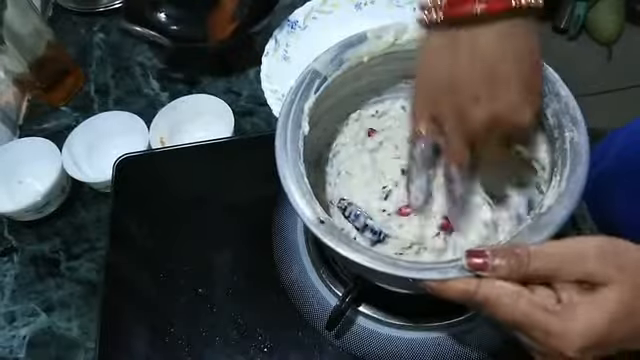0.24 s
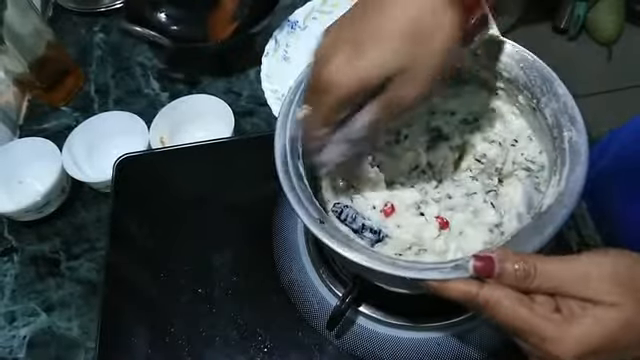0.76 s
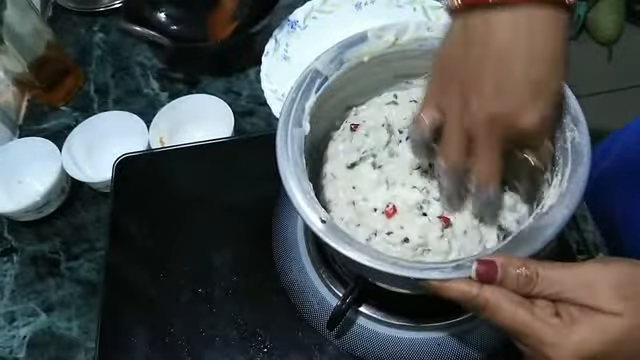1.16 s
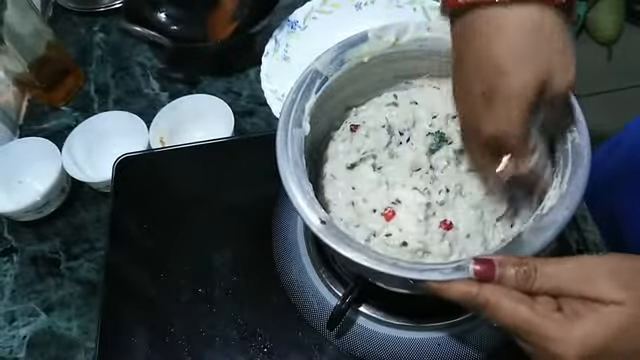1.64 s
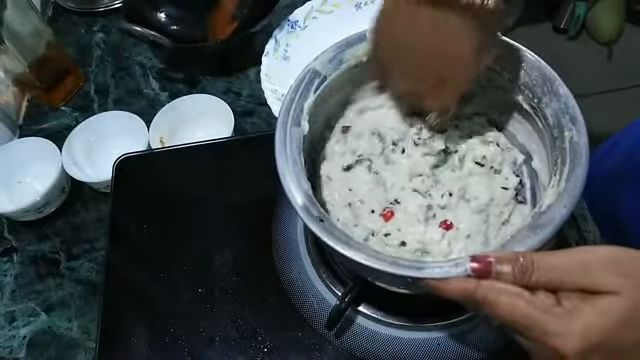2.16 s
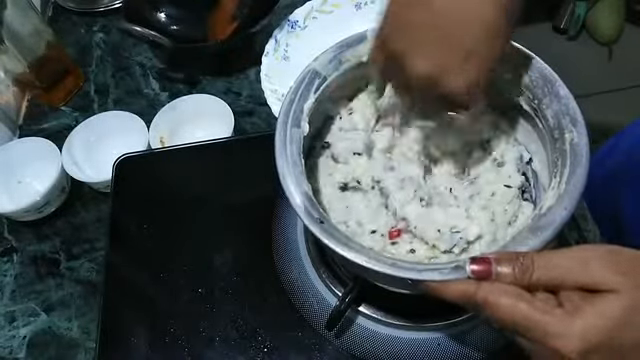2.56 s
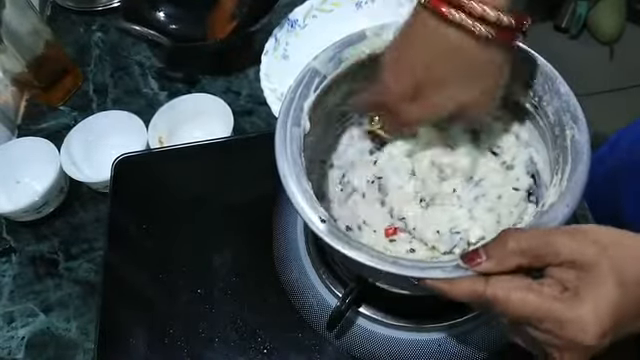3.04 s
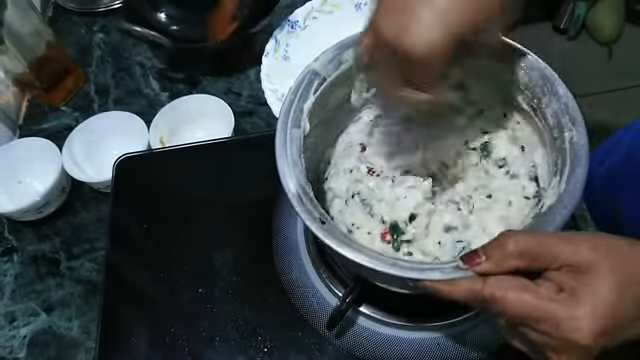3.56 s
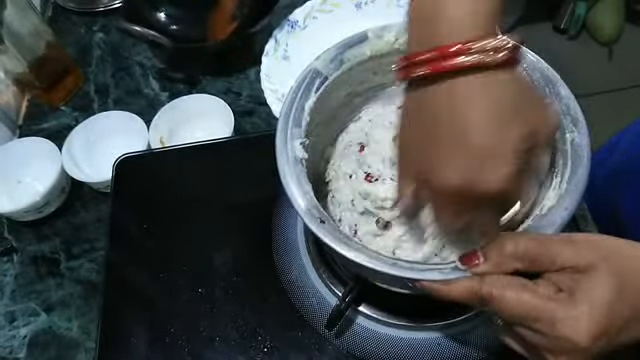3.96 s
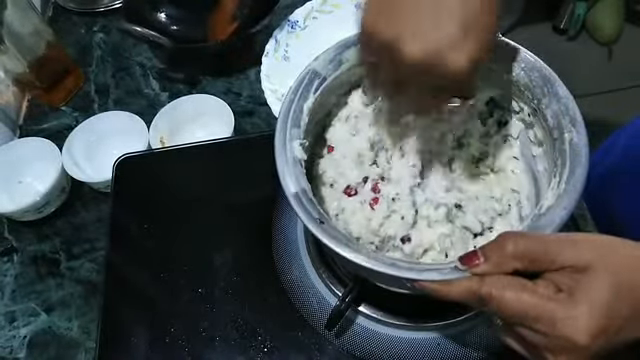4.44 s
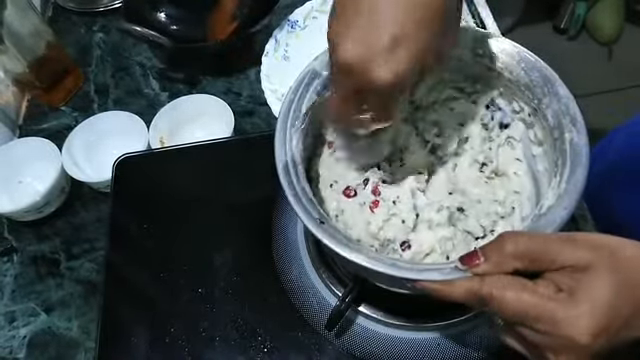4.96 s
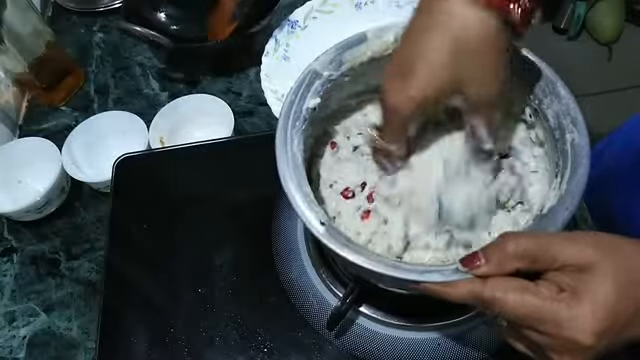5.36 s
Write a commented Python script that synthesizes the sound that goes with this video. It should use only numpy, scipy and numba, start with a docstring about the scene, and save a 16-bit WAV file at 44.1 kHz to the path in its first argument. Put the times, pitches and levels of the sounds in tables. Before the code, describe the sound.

In a small kitchen, close to the microphone, fingers work through wet rice paste with irregular squishes and fine, moist crackles. A sharp clack from the steel bowl comes first, then dull knocks, a hissy squirt and one tiny wet squeak. More squelching, light clicks and knocks follow as the bowl rocks on its stand, easing off and then picking up once more. A low hum runs underneath.

```python
"""Kneading wet rice in a steel bowl.

A hand works the paste on a stove top, an arm's length away in a small tiled kitchen. The bowl knocks
on its stand and rings, damped by the paste. Dragging fingers burst air pockets and squeeze out jets of
air and whey; paste smacks as it leaves the skin. Thin tones, one squeak, a low wavering hum."""
import sys
import numpy as np
from scipy import signal
from scipy.fft import rfft, irfft
from scipy.io import wavfile
from scipy.ndimage import uniform_filter1d
from numba import njit

SR = 44100
rng = np.random.default_rng(int(sys.argv[2]) if len(sys.argv) > 2 else 0)


def digitize_waveform(pressure):
    """Quantize a signal to 16-bit integers and store it at the path in sys.argv[1].

    Rows of a 2-D input are taken as channels; values are limited to [-1, 1].
    """
    field = np.atleast_2d(pressure).T
    bounded = np.clip(field, -1, 1)
    quanta = np.round(bounded * 32767).astype(np.int16)
    wavfile.write(sys.argv[1], SR, quanta)


N = 247401

# hum contour: time_s, level_db
HUM_CONTOUR = [(0.0, -41), (0.11, -48), (0.23, -43), (0.6, -46.5), (1.09, -45), (1.31, -55), (1.64, -45),
               (1.75, -53), (2.08, -47.5), (2.28, -46.5), (2.48, -54), (2.75, -52), (2.98, -44),
               (3.45, -50.5), (4.06, -47.5), (4.48, -51.5), (5.28, -48), (5.61, -52)]
# kitchen resonances in the hum: centre_hz, width_hz, relative_db
HUM_RESONANCES = [(80, 27, -20.5), (113, 8.1, -5.5), (148.5, 19.3, 2), (283.9, 19, -4), (334.1, 12, -13.5),
                  (536.4, 17, -11.5), (602.7, 30, -15.5), (717, 26, -19.5), (820, 110, -29.5)]
# side-channel spectrum of the hum: freq_hz, gain_db
HUM_SIDE_SPECTRUM = [(40, -13), (100, -13), (280, -16), (500, -12.5), (900, -12.5)]
# broad rumble spectrum: freq_hz, relative_db
RUMBLE_SPECTRUM = [(20, -16), (45, -3), (70, 14), (200, 7), (400, 3), (850, -39), (1000, -76.5)]
# thin whistles: centre_hz, width_hz, level_db
WHISTLE_BANDS = [(4060, 45, -89), (5700, 60, -91.5), (6370, 36, -85.5), (8350, 46, -97)]
# hiss spectrum: freq_hz, density_db_per_hz
HISS_SPECTRUM = [(900, -134), (2000, -132), (6000, -132), (12000, -129), (16000, -139)]
# kitchen reverberation: centre_hz, t60_s, level_db, stereo_correlation
REVERB_BANDS = [(118, 0.029, -8, 1), (216.7, 0.26, -4, 1), (472, 0.27, -4.5, 0.85), (1156, 0.21, -5.5, 0),
                (1916, 0.21, -1, 0.21), (4180, 0.21, -1.5, .05), (8900, 0.28, -4, .05),
                (13100, 0.12, -5, .05)]
# thin tones and 4 kHz whistle swells: start_s, level_db, pitch_hz, decay_ms
THIN_TONE_EVENTS = [(1.11, -59, 4560, 65), (0.925, -60, 2900, 27), (2.44, -74, 3960, 44),
                    (2.472, -43, 6120, 2.9), (2.472, -49, 6700, 3.5), (4.655, -74, 4060, 75),
                    (5.076, -52, 6100, 4)]
# wet squeak: start_s, level_db, pitch_hz, decay_ms
SQUEAK_EVENTS = [(1.596, -44, 6140, 15)]
# pitched pops and bowl clacks: start_s, level_db, pitch_hz, decay_ms
POP_CLACK_EVENTS = [(0.074, -41, 1490, 3.7), (0.16, -21, 808, 2.4), (0.161, -18, 1890, 2.2),
                    (0.49, -63, 1410, 12), (0.685, -60, 1320, 25), (0.793, -36.5, 3300, 3.3),
                    (4.107, -36, 2670, 3.4), (0.115, -59, 1420, 25), (0.305, -33, 1690, 3),
                    (2.039, -47, 4850, 3), (3.438, -38, 1460, 4.1), (3.445, -75, 880, 6),
                    (1.834, -30, 2020, 6), (0.69, -56.5, 2260, 11), (0.692, -60.5, 3320, 5.9),
                    (1.612, -54.5, 4400, 5.4), (2.255, -55.5, 1000, 23), (2.298, -44, 1330, 4.3),
                    (2.3, -47.5, 2650, 6.1), (2.764, -43, 4580, 6), (2.872, -47.5, 1205, 9.8),
                    (2.912, -47, 1287, 16), (2.945, -50, 1454, 15), (2.955, -41, 4140, 3),
                    (3.0, -48, 1486, 12), (3.035, -52, 2500, 12), (3.059, -46.5, 4930, 3.3),
                    (3.073, -61, 1240, 6), (3.149, -29.5, 1184, 5.9), (3.56, -72, 2140, 36),
                    (3.59, -65, 3370, 13), (3.679, -43, 2860, 4.2), (3.682, -47.5, 2166, 8.4),
                    (3.688, -50, 4200, 9), (3.693, -49, 2790, 5), (3.734, -43, 2070, 4.5),
                    (3.77, -50, 1350, 6.9), (3.79, -54, 1360, 13), (3.838, -52, 2200, 9),
                    (3.844, -45, 1206, 6.8), (3.882, -55, 1520, 3.7), (3.903, -46, 1530, 6.4),
                    (3.92, -57, 2770, 9), (3.926, -62, 4600, 5.5), (3.944, -60, 2850, 6),
                    (4.106, -37, 1767, 9.8), (4.124, -38.5, 895, 8.6), (4.667, -54.5, 1770, 5.7),
                    (4.668, -60, 2900, 8.1), (4.686, -78, 1256, 15), (4.762, -43, 2380, 2.8),
                    (4.852, -71, 3370, 8.5), (4.862, -64.5, 2740, 14), (4.865, -66.5, 1204, 37),
                    (4.953, -58.5, 1730, 11), (4.956, -65, 2670, 5), (4.975, -66, 2140, 16),
                    (5.192, -38, 872, 8.7), (5.221, -50.5, 5540, 5), (5.227, -45.5, 3320, 7.1)]
# jets between the fingers: start_s, level_db, centre_hz, decay_ms
SQUIRT_EVENTS = [(0.987, -35, 8300, 23), (1.526, -23.5, 6700, 3.4), (1.578, -23, 4700, 13.2),
                 (1.592, -27.5, 2000, 13.2), (2.035, -50.5, 6450, 71), (2.727, -40, 8800, 27),
                 (2.773, -34, 4900, 18.6), (2.775, -52, 1070, 360), (2.909, -31.5, 6960, 17),
                 (3.677, -39.5, 5800, 36), (4.308, -30.5, 8900, 10.2), (5.14, -51, 6900, 14),
                 (5.208, -35, 5300, 10.6)]
# paste leaving skin: start_s, direct_db, centre_hz, walls_db, body_re_tick_db
SMACK_EVENTS = [(0.126, -58, 4730, -71, -15), (0.256, -59, 9500, -76, -20), (0.308, -54, 8950, -60, 4),
                (0.3307, -59, 8540, -71, -16), (0.451, -64, 10600, -75, -13),
                (0.4583, -54.5, 4030, -61, -23), (0.5562, -66, 6430, -66.5, -41),
                (0.913, -49, 4900, -44, -3), (1.275, -59, 9900, -65, -0.5), (1.372, -72.5, 4750, -82, 6.5),
                (1.636, -53.5, 6600, -71, 4.5), (1.7032, -46.5, 9300, -62, -3.5),
                (2.0376, -62, 4940, -53.5, -13), (2.039, -54.5, 10900, -54, -18),
                (2.07, -54, 9600, -60, -26), (2.142, -62, 10100, -66, -13), (2.37, -74, 12400, -73, -7),
                (2.4753, -66, 6430, -68, -3), (2.6597, -65.5, 12750, -65.5, -13.5),
                (2.69, -70, 6300, -69.5, -9.5), (2.7657, -51.5, 4570, -59, -22.5),
                (2.7735, -71, 4120, -54.5, -24), (3.0588, -61, 6500, -72, -17),
                (3.2065, -76, 4170, -64, -15), (3.266, -64.5, 13200, -82, -3),
                (3.3189, -52, 10700, -63, -11.5), (3.3335, -57, 10700, -62.5, -29),
                (3.367, -69, 10700, -64.5, -16), (3.4872, -60.5, 10700, -68, -4),
                (3.898, -61, 4870, -58.5, 4), (4.045, -72, 5500, -72, -2), (4.159, -67, 6950, -74, -20),
                (4.298, -54, 6500, -61, -0.5), (4.4506, -55.5, 11460, -62.5, -9.5),
                (4.7597, -62, 8300, -59.5, -23.5), (5.001, -74, 11100, -67.5, -12),
                (5.0642, -66, 7050, -53, -8), (5.0767, -53.5, 5930, -61, -28),
                (5.141, -73, 6550, -51.5, -2), (5.3597, -66, 12700, -65, -14),
                (5.3947, -57, 12900, -61, -10), (5.414, -58.5, 9800, -59.5, -21)]
# finger strokes: full_pressure_s, hold_s, squelch_db, sizzle_db, bubble_hz
FINGER_STROKES = [(0.0, 0.0051, -50, -44, 1211), (0.138, 0.051, -46.5, -42.5, 1717),
                  (0.255, 0.13, -51, -61.5, 1372), (0.412, 0.1, -74, -69, 1238),
                  (0.554, 0.049, -81.5, -84.5, 1394), (0.67, 0.46, -73, -79, 1430),
                  (1.006, 0.049, -58, -54, 1685), (1.13, 0.09, -55.5, -60, 1623),
                  (1.369, 0.03, -87, -69.5, 1723), (1.602, 0.035, -57.5, -44.5, 1100),
                  (1.732, 0.029, -69.5, -66, 1256), (1.863, 0.044, -58.5, -70, 1810),
                  (2.078, 0.013, -56, -53.5, 1050), (2.163, 0.013, -61, -71, 1300),
                  (2.305, 0.025, -58, -82, 1000), (2.444, .02, -82, -74.5, 1076),
                  (2.571, 0.11, -89.5, -83.5, 1498), (2.774, 0.069, -67, -57, 1109),
                  (2.904, 0.061, -55, -51.5, 1290), (3.02, 0.18, -61.5, -56, 1460),
                  (3.278, 0.055, -72.5, -74, 1227), (3.506, 0.031, -67.5, -70, 1247),
                  (3.72, 0.027, -58, -51, 1433), (3.827, 0.095, -55, -56, 1300),
                  (3.971, 0.02, -53, -49.5, 1205), (4.136, 0.025, -50, -54.5, 1180),
                  (4.296, 0.012, -66.5, -60, 1432), (4.425, 0.042, -90, -71.5, 1225),
                  (4.481, 0.021, -82.5, -83, 2184), (4.559, 0.12, -89, -96.5, 1690),
                  (4.78, 0.028, -88.5, -67.5, 1866), (4.935, 0.018, -74.5, -101, 1183),
                  (5.08, 0.043, -87.5, -63, 1607), (5.164, 0.033, -59, -55.5, 1316),
                  (5.299, 0.041, -59.5, -67, 1267), (5.391, 0.015, -63.5, -72, 1047),
                  (5.59, .03, -94.5, -69.5, 1018)]
# crackle and sizzle spectrum: freq_hz, relative_db
PASTE_SPECTRUM = [(470, -45.5), (800, 29), (1180, 20.5), (1320, 19), (1850, 3), (2500, 0.5), (2770, 4.5),
                  (4740, -2), (13300, -8.5), (16000, -1.5)]
# modes of bowl and stand, damped by paste: freq_hz, relative_db, t60_s
BOWL_MODES = [(280.2, 0.5, .085), (326, 1, 0.039), (418.7, -5, 0.065), (567, -13, 0.045),
              (615, -12.5, 0.049), (683, -8, 0.034), (826, 1.2, 0.016), (1307, 5, 0.0098),
              (1460, -13, 0.021), (1760, -14.5, 0.026), (2078, -1, 0.02), (2910, -24, 0.14),
              (3750, -12.5, 0.044)]
# bowl on stand: start_s, thud_db, clack_db, treble_db, contact_ms, rocking_db, clack_shift_oct
KNOCK_EVENTS = [(0.069, -39, -48, -58.5, 10.4, -7, -0.93), (0.159, -33, -29.5, -42.5, 2.2, -3, 0.01),
                (0.165, -36.5, -74, -78, 9.8, -6, 0.3), (0.307, -43, -45.5, -62, 2.3, -11, -1.05),
                (0.329, -45.5, -58, -80, 21, -3, -0.5), (0.681, -55, -70, -93, 9.2, 5, -0.5),
                (0.793, -42, -50.5, -70, 10, 0.5, -0.21), (0.913, -55, -52.5, -59.5, 2.3, -7, -0.25),
                (1.044, -39.5, -46, -70, 4.1, 0, -0.1), (1.061, -35, -40.5, -58, 2.5, -8.5, 0.22),
                (1.105, -32, -33, -59, 3.1, -8, 0.04), (1.118, -42, -72, -75, 11, 5, .1),
                (1.246, -52, -61.5, -71, 14, -1, 0.2), (1.831, -37, -42.5, -68, 2.1, -14.5, -0.31),
                (2.089, -50.5, -71, -85, 2, 13.5, -0.8), (2.097, -44.5, -57, -86, 1.02, -3, -.7),
                (2.211, -48.5, -95, -82, 11, 9, -.7), (2.256, -53, -94, -88, 2.3, -4, -.7),
                (2.3, -49, -65.5, -86, 12, -3, -0.35), (2.769, -47.5, -72, -53, 4.1, -0.5, -0.3),
                (2.998, -50, -59, -88, 7.2, 5, -0.3), (3.073, -48.5, -56, -86, 8.5, -2, -0.23),
                (3.125, -39.5, -50.5, -84, 6, 0, -0.1), (3.133, -37.5, -60, -63, 8.7, 2.5, -.6),
                (3.149, -37.5, -46.5, -84, 2.2, 4, -.6), (3.163, -49, -69, -85, 2.4, 10, -0.7),
                (3.203, -53.5, -61, -81, 6.3, 7, -.6), (3.437, -48, -55.5, -74, 5.9, -5, 0.12),
                (3.677, -52, -59, -52, 48, -3, -0.36), (3.971, -43, -57, -63.5, 1.27, -11, -0.37),
                (4.105, -44, -46.5, -74, 1.6, 2, -0.38), (4.122, -41, -56.5, -74, 5, -1, -0.4),
                (4.432, -52, -90, -76, 11, 10.5, .1), (4.666, -56, -68.5, -89, 15, 2.5, -0.34),
                (4.76, -51.5, -69, -87, 1.6, 14, 0.3), (4.85, -64, -74, -86, 9.7, -1, -0.2),
                (4.954, -57.5, -87, -93.5, 4.6, 4, 0.3), (5.192, -44.5, -60, -73, 11, -4, -.6),
                (5.208, -41, -52.5, -64, 1.1, 1.5, -0.32), (5.22, -49.5, -60, -65, 10, -6, -0.3),
                (5.322, -41.5, -54, -77, 6, -2, -0.67), (5.345, -49, -80, -76, 1.9, 0, -.6)]


def undb(db):
    """Decibels to gain."""
    return 10 ** (np.asarray(db, float) / 20)


def unit(x):
    """Scale each row to rms 1."""
    return x / np.sqrt(np.mean(x ** 2, axis=-1, keepdims=True))


def band(x, lo_hz, hi_hz, order=2):
    """Causal band-pass."""
    sos = signal.butter(order, [lo_hz, min(hi_hz, .45 * SR)], "bandpass", fs=SR, output="sos")
    return signal.sosfilt(sos, x)


@njit
def svf(x, hz, q):
    """State-variable band-pass, centre per sample, unity peak gain."""
    y, band_state, low_state = np.empty(len(x)), 0., 0.
    for i in range(len(x)):
        g = np.tan(np.pi * hz[i] / SR)
        v = (band_state + g * (x[i] - low_state)) / (1 + g * (g + 1 / q))
        band_state = 2 * v - band_state
        low_state += 2 * g * v
        y[i] = v / q
    return y


def resonate(x, hz, q, stages=2):
    """Cascaded band-passes, steady or moving centre, rms 1."""
    for _ in range(stages):
        x = svf(x, hz + np.zeros(len(x)), q)
    return unit(x)


def colour(x, spectrum):
    """Filter by (freq_hz, gain_db) points; nothing passes below the first."""
    hz, db = np.transpose(spectrum)
    n = x.shape[-1]
    bin_hz = np.maximum(np.arange(n // 2 + 1) * SR / n, 1)
    return irfft(rfft(x) * undb(np.interp(np.log(bin_hz), np.log(hz), db, left=-200)), n)


def noise_band(hz, width_hz, order=2):
    """Narrow stereo noise, rms 1."""
    return unit(band(rng.standard_normal((2, N)), hz - width_hz / 2, hz + width_hz / 2, order))


def walk(rate_hz):
    """Smoothed random steps, rms 1."""
    hold = int(SR / rate_hz)
    steps = np.repeat(rng.standard_normal(N // hold + 1), hold)
    return unit(uniform_filter1d(uniform_filter1d(steps, hold), hold)[:N])


def grains(per_s, spread_db):
    """Random impulses of uneven, bounded size."""
    out, count = np.zeros(N), int(per_s * N / SR)
    signs = rng.choice([-1., 1.], count)
    sizes = undb(spread_db * np.minimum(rng.exponential(size=count), 3))
    out[rng.integers(0, N, count)] = signs * sizes
    return unit(out)


def puff(t, rise_ms, decay_ms):
    """Exponential rise and decay."""
    return (1 - np.exp(-t * 1000 / rise_ms)) * np.exp(-t * 1000 / decay_ms)


def add(out, start_s, sound, pan_db):
    """Mix in a short sound; negative pan is right."""
    i = int(start_s * SR)
    n = min(sound.shape[-1], N - i)
    out[:, i:i + n] += undb([[pan_db / 2], [-pan_db / 2]]) * sound[..., :n]


def tones(events, rise_ms, glide_per_s, flutter_rad):
    """Decaying sines with glide and phase flutter; higher pitches lean right."""
    out, t = np.zeros((2, N)), np.arange(12288) / SR
    flutters = unit(uniform_filter1d(rng.standard_normal((len(events), len(t))), size=100))
    for (start_s, db, hz, decay_ms), flutter in zip(events, flutters):
        cycles = hz * (t + glide_per_s * t ** 2 / 2) + rng.random()
        tone = np.sin(2 * np.pi * cycles + flutter_rad * flutter)
        add(out, start_s, undb(db) * tone * puff(t, rise_ms, decay_ms), pan_db=-5 * np.log2(hz / 1000))
    return out


def hum():
    """Rumble in the kitchen's resonances, each wavering alone; faint whistles and hiss above."""
    modes = sum(undb(db + 2.5 * walk(7)) * noise_band(hz, width_hz)
                for hz, width_hz, db in HUM_RESONANCES)
    rumble = unit(colour(rng.standard_normal((2, N)), RUMBLE_SPECTRUM))
    level_db = np.interp(np.arange(N) / SR, *np.transpose(HUM_CONTOUR))
    level_db += 2.87 * np.minimum(walk(14), .8)  # brief dips, capped peaks
    mid, side = unit(unit(modes) + undb(-2.5) * rumble) * undb(level_db)
    side = colour(side, [(0.89, -5.5)] + HUM_SIDE_SPECTRUM)
    whistles = sum(undb(db + 3.6 * walk(12)) * noise_band(hz, width_hz, order=1)
                   for hz, width_hz, db in WHISTLE_BANDS)
    hiss = np.sqrt(SR / 2) * colour(rng.standard_normal((2, N)), HISS_SPECTRUM) * undb(walk(3.9))
    return np.array([mid + side, mid - side]) + whistles + hiss


def kitchen(x):
    """Wall reflections: decaying noise per octave band, channels alike only in the bass."""
    t = np.arange(int(.6 * SR)) / SR
    tail = np.zeros((2, len(t)))
    for hz, t60_s, db, correlation in REVERB_BANDS:
        mid, side = band(rng.standard_normal((2, len(t))), hz / np.sqrt(2), hz * np.sqrt(2))
        pair = np.sqrt((1 + correlation) / 2) * mid + np.sqrt((1 - correlation) / 2) * side * [[1], [-1]]
        fade = puff(t, 0.18, 1000 * t60_s / np.log(1000))
        tail += undb(db) * pair * fade / np.sqrt(np.sum(fade ** 2))
    return signal.fftconvolve(x, tail, axes=1)[:, :N]


def thin_tones():
    """Brief swells of the faint 4 kHz background whistle, among thin tones of steady pitch."""
    return tones(THIN_TONE_EVENTS, rise_ms=1.8, glide_per_s=0, flutter_rad=0.18)


def squeak():
    """Wet squeak between the fingers, pitch falling."""
    return tones(SQUEAK_EVENTS, rise_ms=8, glide_per_s=-8, flutter_rad=0.85)


def pops_and_clacks():
    """Short pitched pops and sharp clacks of the bowl, rising slightly in pitch."""
    return tones(POP_CLACK_EVENTS, rise_ms=1.7, glide_per_s=1.3, flutter_rad=0.65)


def squirts(rise_ms=28.5, start_ratio=0.89):
    """Jets of air and whey: spitting hiss that glides up through its centre."""
    out, t = np.zeros((2, N)), np.arange(int(.3 * SR)) / SR
    for start_s, db, centre_hz, decay_ms in SQUIRT_EVENTS:
        hz = centre_hz * start_ratio ** (2 * np.exp(-t * 1000 / (rise_ms + decay_ms)) - 1)
        noise = rng.standard_normal((2, len(t)))
        spit_db = 2.8 * np.repeat(rng.standard_normal(len(t) // 64 + 1), 64)[:len(t)]  # 1.5 ms steps
        jet = np.array([resonate(channel, hz, q=0.79) for channel in noise * undb(spit_db)])
        add(out, start_s, undb(db) * jet * puff(t, rise_ms, decay_ms), pan_db=0)
    return out


def smacks(pan_db=-7.5):
    """Paste snaps off skin, then peels faintly: a tick over a duller body. Returns direct, to walls."""
    direct, to_walls, t = np.zeros((2, N)), np.zeros((2, N)), np.arange(1024) / SR
    snap, peel = puff(t, .25, .6), undb(-10) * puff(t, 1.2, 2.5)
    for start_s, direct_db, hz, walls_db, body_db in SMACK_EVENTS:
        release = rng.standard_normal(len(t)) * (snap + peel)
        tick = resonate(release, hz, q=0.96)
        body = undb(body_db) * resonate(release, hz=3020, q=1, stages=1)
        add(direct, start_s, undb(direct_db) * (tick + body), pan_db)
        add(to_walls, start_s, undb(walls_db) * (tick + body), pan_db)
    return direct, to_walls


def strokes(press_db_per_s=330.5, ease_db_per_s=234.5):
    """Fingers press, hold, ease off. Returns squelch gain, sizzle gain, gain-weighted bubble pitch."""
    full_s, hold_s, squelch_db, sizzle_db, bubble_hz = np.transpose(FINGER_STROKES)[:, :, None]
    t = np.arange(0, N + 64, 64) / SR
    press_db = -press_db_per_s * np.maximum(full_s - t, 0)
    shape_db = press_db - ease_db_per_s * np.maximum(t - full_s - hold_s, 0)
    squelch, sizzle = undb(squelch_db + shape_db), undb(sizzle_db + shape_db)
    pitch_hz = (squelch * bubble_hz).sum(0) / squelch.sum(0)
    return [np.interp(np.arange(N) / SR, t, c) for c in (squelch.sum(0), sizzle.sum(0), pitch_hz)]


def finger_drag():
    """Air pockets burst in the paste: short bubbles round a moving pitch, crackle, fine sizzle."""
    squelch_gain, sizzle_gain, bubble_hz = strokes()
    bubbles = sum(svf(grains(per_s=140, spread_db=6), bubble_hz * ratio * 2 ** (0.11 * walk(25)), q=12.0)
                  for ratio in (.75, 1.05, 1.5, 2.1))
    channels = []
    for _ in range(2):
        crackle = band(colour(grains(per_s=400, spread_db=7), PASTE_SPECTRUM), 640, 5500)
        fine_bursts = grains(per_s=1800, spread_db=3.5) + 0.45 * rng.standard_normal(N)
        sizzle = unit(band(colour(fine_bursts, PASTE_SPECTRUM), 3780, .45 * SR))
        squelch = unit(unit(bubbles) + 1.05 * unit(crackle)) * squelch_gain * undb(3.57 * walk(45))
        channels.append(squelch + sizzle * sizzle_gain * undb(1.8 * walk(60)))
    return np.array(channels)


def bowl_ring(force, rocking_db, rocking_below_hz=370):
    """Damped modes, one force row per blow; each blow lands elsewhere and favours other modes."""
    out, scatter_db = 0, 2 * rng.standard_normal((len(force), len(BOWL_MODES)))
    for k, (hz, db, t60_s) in enumerate(BOWL_MODES):
        radius = np.exp(-np.log(1000) / (t60_s * SR))
        feedback = [1, -2 * radius * np.cos(2 * np.pi * hz / SR), radius ** 2]
        mode = unit(signal.lfilter([1], feedback, force)) / np.sqrt(1 - radius) / 2
        out = out + undb(db + rocking_db * (hz < rocking_below_hz) + scatter_db[:, k:k + 1]) * mode
    return out


def knocks(rise_ms=0.54, rock_rise_ms=3.4, clack_hz=2085):
    """Rattling contact, length set per knock, sounds directly and rings the bowl; rocking lags the rim."""
    start_s, thud_db, clack_db, treble_db, contact_ms, rocking_db, shift_oct = (
        np.transpose(KNOCK_EVENTS)[:, :, None])
    t = np.arange(6144) / SR
    rattle = undb(3 * np.repeat(rng.standard_normal((len(start_s), len(t) // 32)), 32, axis=1))
    force = unit(rng.standard_normal(rattle.shape) * rattle * puff(t, rise_ms, contact_ms))
    ring = bowl_ring(force, rocking_db)
    rock = (force + undb(-27.5) * ring) * (1 - np.exp(-t * 1000 / rock_rise_ms))
    thud = unit(band(rock, 300.4, 1008, order=3)) * undb(thud_db)
    rim, rim_hz = force + undb(-44) * ring, clack_hz * 2 ** shift_oct
    clack = np.array([resonate(blow, hz, q=0.82) for blow, hz in zip(rim, rim_hz)]) * undb(clack_db)
    treble = unit(band(force, 2800, 11200)) * undb(treble_db)
    out = np.zeros((2, N))
    for at_s, body, top in zip(start_s[:, 0], thud + clack, treble):
        add(out, at_s, body, pan_db=-0.2)
        add(out, at_s, top, pan_db=-8)
    return out


def scene():
    """Bowl and paste, direct and off the walls, over the hum."""
    smacks_direct, smacks_to_walls = smacks()
    knocks_squirts = knocks() + squirts()
    drag = finger_drag()
    pitched = pops_and_clacks() + squeak()
    direct = undb(-6) * knocks_squirts + undb(-2) * drag + undb(4.5) * pitched + smacks_direct
    to_walls = knocks_squirts + undb(-3) * drag + undb(-4) * pitched + smacks_to_walls
    return direct + thin_tones() + kitchen(to_walls) + hum()


def record(dry):
    """Two spaced microphone ports, the right earlier and brighter; capsule droop, then a steep top cut."""
    port_lag_ms, cutoff_hz = 0.15, 15800
    hz = np.arange(N // 2 + 1) * SR / N
    right_lift = undb(0.77 + 0.69 / (1 + (6000 / np.maximum(hz, 1)) ** 4))
    left_delay = np.exp(-2j * np.pi * hz * port_lag_ms / 1000)
    ports = np.array([left_delay / np.sqrt(right_lift), np.sqrt(right_lift)])
    droop = undb(-8 * (hz / 15500) ** 6)
    stereo = irfft(rfft(dry) * droop * ports, N)
    return signal.sosfilt(signal.ellip(10, .2, 60, cutoff_hz, fs=SR, output="sos"), stereo)


dry = scene()
out = record(dry)
digitize_waveform(out)
```